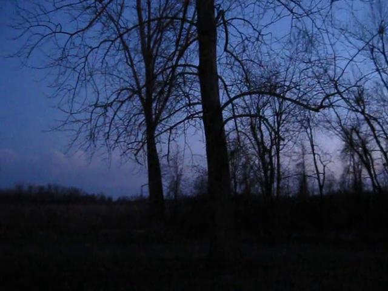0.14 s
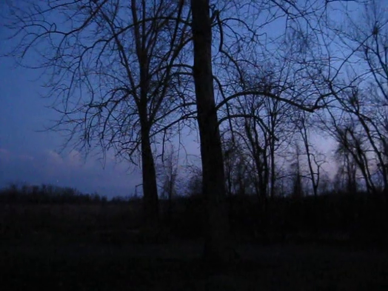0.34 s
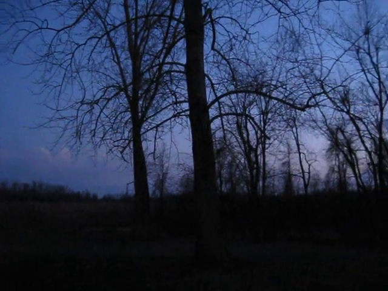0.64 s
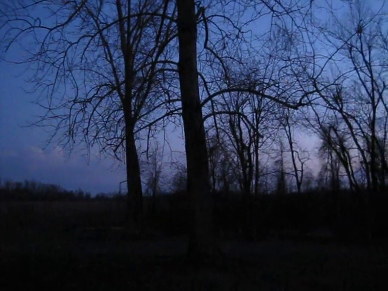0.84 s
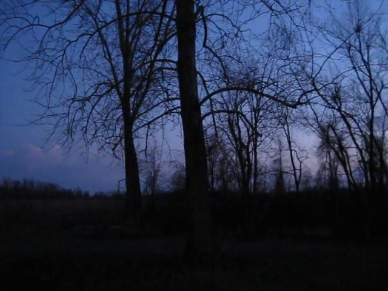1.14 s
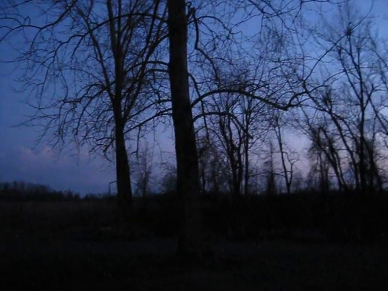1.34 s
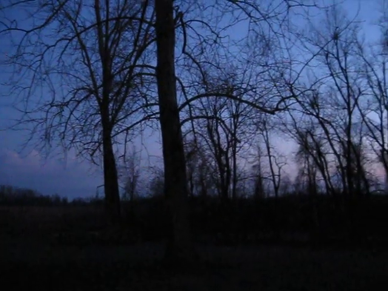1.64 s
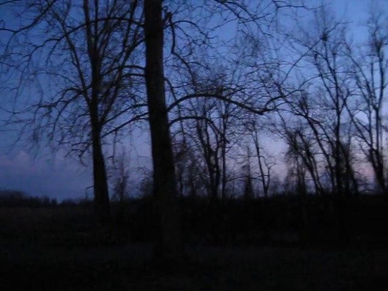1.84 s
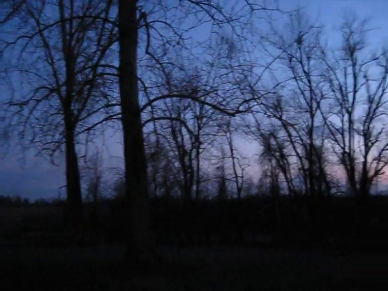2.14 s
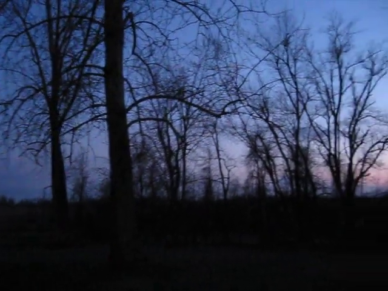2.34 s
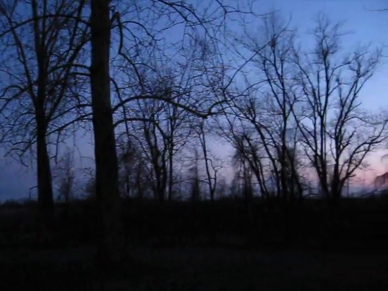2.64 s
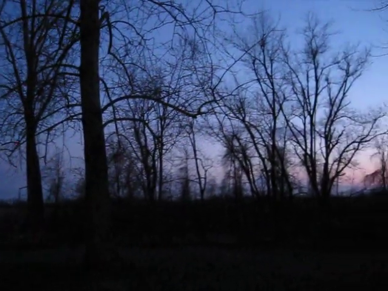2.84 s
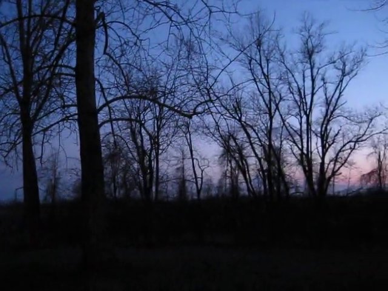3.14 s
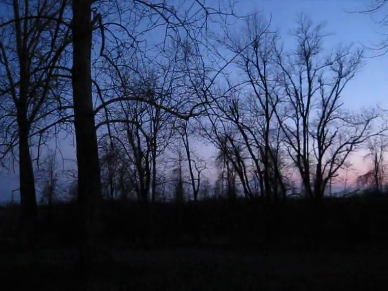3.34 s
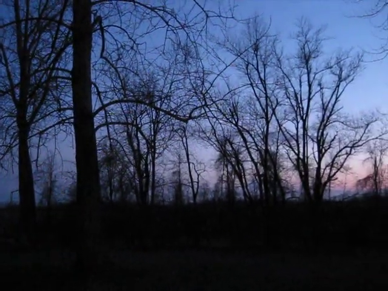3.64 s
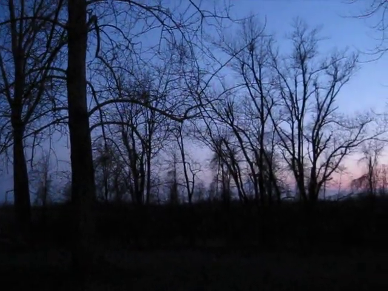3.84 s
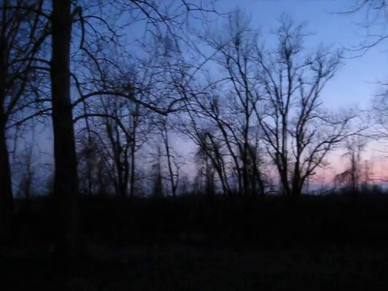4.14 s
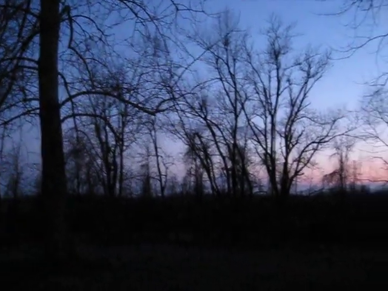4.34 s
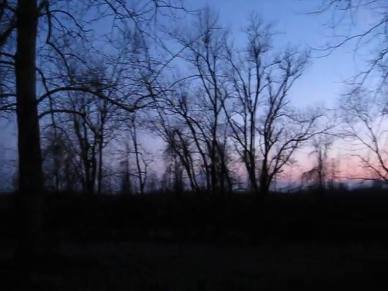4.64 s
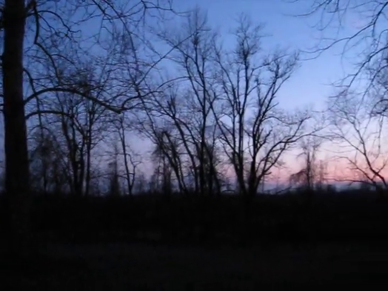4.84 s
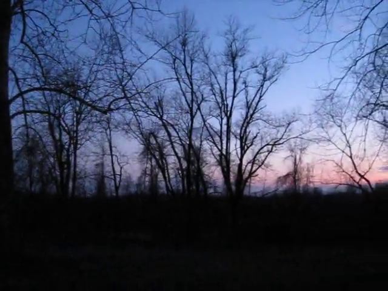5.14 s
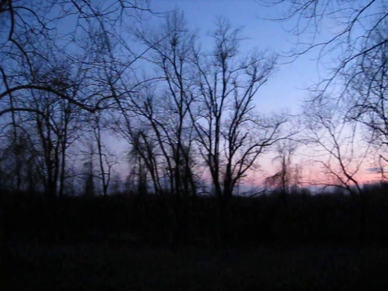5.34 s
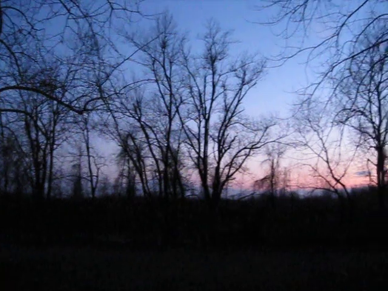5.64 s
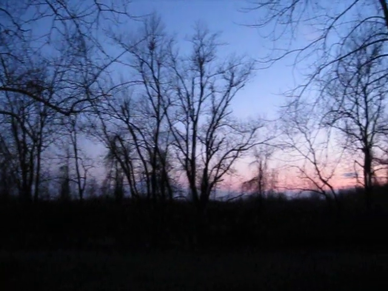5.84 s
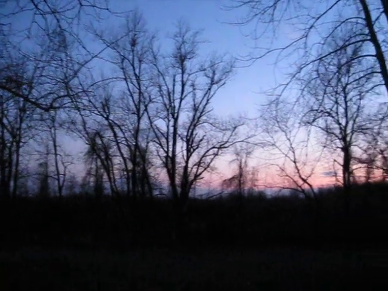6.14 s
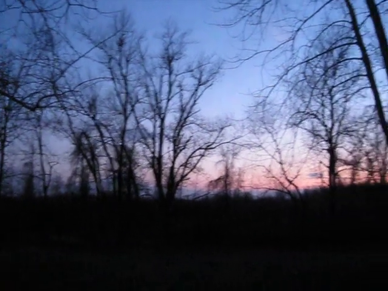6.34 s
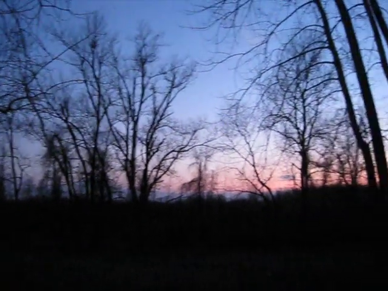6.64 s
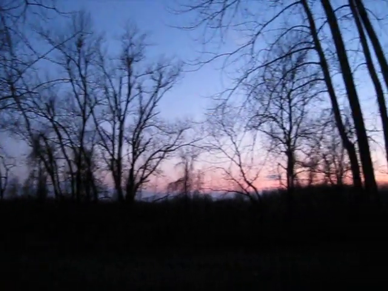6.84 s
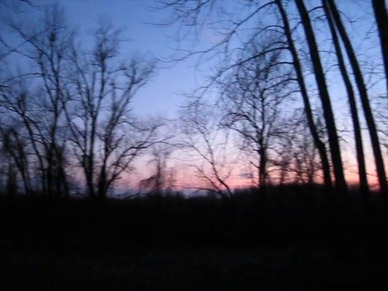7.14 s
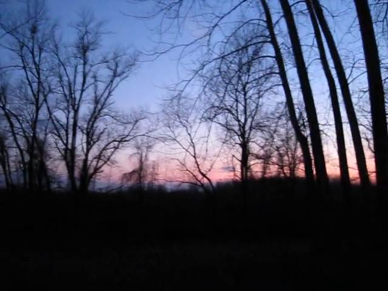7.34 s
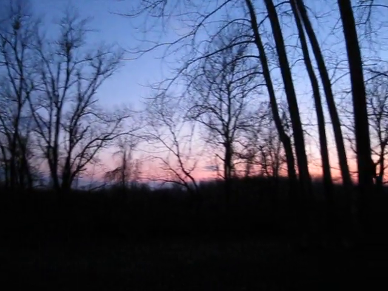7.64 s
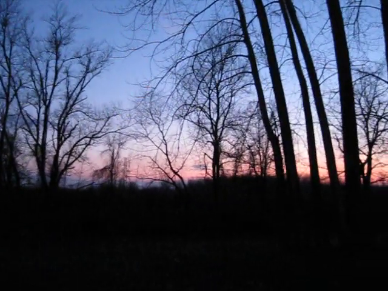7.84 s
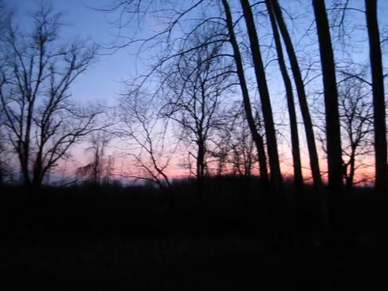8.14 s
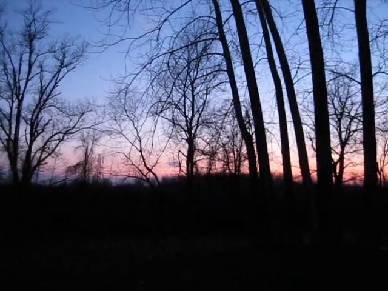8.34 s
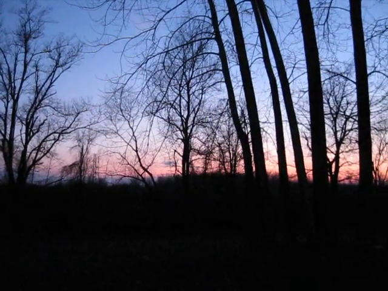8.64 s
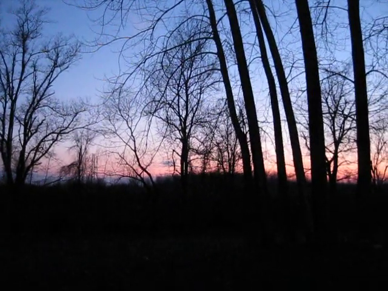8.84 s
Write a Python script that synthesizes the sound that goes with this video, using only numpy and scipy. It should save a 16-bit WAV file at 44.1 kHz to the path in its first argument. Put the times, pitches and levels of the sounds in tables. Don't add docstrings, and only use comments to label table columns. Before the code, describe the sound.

Hundreds of tiny frogs whistle rising peeps in a shimmering wall outdoors, dotted with short bird chirps, faint clicking trills and a distant engine drone.

```python
import sys
import numpy as np
from scipy import signal
from scipy.fft import rfft, irfft
from scipy.io import wavfile
from scipy.ndimage import uniform_filter1d

SR = 44100
rng = np.random.default_rng(int(sys.argv[2]) if len(sys.argv) > 2 else 0)


def unload_audio(sound):
    columns = np.transpose(np.atleast_2d(sound))
    steps = np.round(np.clip(columns, -1, 1) * 32767)
    wavfile.write(sys.argv[1], SR, steps.astype(np.int16))


def linear_from_db(decibels):
    return 10 ** (np.asarray(decibels, float) / 20)


N = 396900

# time in seconds, level in dB.
CHORUS_LEVEL = [
    (0, -33.5),
    (1.8, -33),
    (3, -33.5),
    (5.6, -33.5),
    (6.3, -35),
    (6.7, -34.5),
    (7.2, -35.5),
    (9, -34.5),
]
# start in seconds, middle pitch in Hz, peak in dB, upward glide in Hz per s.
NEAR_PEEPS = [(0.144, 2874, -28.5, 3000), (0.248, 2890, -31, 2040), (0.35, 3000, -31, 2020),
              (0.777, 2920, -45, 2950), (0.878, 3013, -30.5, 1010), (0.947, 2840, -35, 2040),
              (1.068, 3080, -28, 2970), (1.188, 3020, -33, 1030), (1.311, 2870, -32, 1030),
              (1.551, 2970, -29, 1010), (1.747, 3110, -28.5, 2990), (1.882, 2933, -36, 1990),
              (2.337, 2880, -31, 3020), (2.381, 2980, -30, 1975), (2.551, 2905, -35, 1990),
              (2.679, 2894, -28, 2100), (2.794, 2867, -29, 1000), (3.38, 2930, -38, 980),
              (3.565, 2987, -35, 1000), (3.755, 2935, -32, 2990), (4.099, 2816, -31.5, 3030),
              (5.27, 3000, -35.5, 1990), (5.693, 2966, -33, 2010), (6.311, 2820, -33.5, 2070),
              (6.43, 2887, -36, 990), (6.53, 2870, -32, 980), (6.735, 2930, -31.5, 1000),
              (8.402, 3003, -39, 3100)]
# time in seconds, peak in dB.
TICKS = [(0.2653, -47), (0.3152, -44), (0.3516, -43), (0.3915, -44), (0.4344, -39), (0.4793, -42),
         (0.5267, -46), (2.1306, -45), (2.1675, -40), (2.2064, -39), (2.2463, -40), (2.2877, -39),
         (2.3291, -42), (2.7906, -41), (2.8459, -39), (2.9073, -36), (2.9652, -38), (3.0165, -37),
         (4.6698, -43), (4.7331, -40), (4.7905, -41)]
# start in seconds, length in seconds, clicks per second, pitch in Hz, level in dB.
NEAR_TRILLS = [
    (2.7, 0.33, 23, 2300, -46),
]
# time in seconds, peak in dB.
KNOCKS = [(7.7913, -50), (7.9456, -51), (7.9982, -49), (8.0486, -55), (8.0945, -54), (8.142, -53),
          (8.1946, -49), (8.2565, -51), (8.2894, -52), (8.3536, -50), (8.439, -46), (8.5285, -52),
          (8.5886, -46), (8.7036, -44.5), (8.759, -49), (8.7999, -53), (8.8553, -48), (8.9042, -54)]

# start in seconds, low voice in Hz, its level in dB,
# high voice in Hz, its level in dB.
CHIRPS = [(0.0594, 4260, -43, 6860, -55.5), (0.557, 4264, -44, 7280, -55.5),
          (1.0938, 4220, -34.5, 6520, -47), (1.39, 4380, -37, 7090, -51.5), (1.875, 4340, -33, 6680, -48),
          (2.379, 4260, -43, 7030, -54.5), (3.158, 4350, -47, 6950, -58), (3.6753, 4350, -36.5, 6970, -52),
          (4.013, 4285, -44.5, 6920, -56.5), (4.7233, 4200, -40, 6440, -50),
          (4.977, 4360, -48.5, 6990, -59.5), (5.505, 4290, -39, 6850, -49), (5.8872, 4220, -47, 6950, -62),
          (6.739, 4290, -48, 6850, -62.5), (7.198, 4250, -38.5, 6710, -50.5),
          (7.3916, 4254, -50, 7000, -64), (8.8573, 4265, -39.5, 6570, -52.5)]
# start in seconds, low voice in Hz, its level in dB,
# high voice in Hz, its level in dB.
ANSWERS = [
    (3.0277, 4210, -41.5, 6660, -56.5),
    (3.756, 4180, -42.5, 6730, -59),
    (5.615, 4100, -41, 6650, -59),
    (7.8903, 4070, -41, 6400, -60.5),
]
# echo of the low voice in dB,
# closing slur in dB, climb in Hz per s, depth of the opening scoop as a fraction of pitch.
CARRY = [(-43, -41, 1000, .18), (-39, -43, 1000, .18), (-47, -41, 4500, .2), (-40, -36, 2500, .2),
         (-46, -43, 2500, .19), (-41, -40, 1000, .17), (-52, -47, -900, .23), (-39, -37, 1000, .21),
         (-50, -50, 4000, .18), (-53, -52, -600, .23), (-41, -41, 800, .15), (-51, -46, 1200, .19),
         (-40, -38, 1200, .2), (-49, -44, 3000, .18), (-52, -52, -800, .23), (-39, -45, 300, .12),
         (-43, -42, 500, .19), (-51, -45, 300, .19), (-45, -52, 500, .15), (-54, -52, -800, .21),
         (-46, -47, 500, .19)]
# frequency in Hz, gain in dB.
BEAK = [(2000, -45), (3500, -1), (3900, 1), (4100, 5), (4400, 0), (4700, 12), (5300, 2.5), (6000, 6.5),
        (7000, 1.5)]
# frequency in Hz, gain in dB.
SUM_TONE_GAIN = [(3500, -8), (4600, 10), (5300, 4), (6000, -9), (9800, -13), (10500, -2), (11800, 0),
                 (12600, -8), (13500, -14)]
# start in seconds, length in seconds, start pitch in Hz,
# end pitch in Hz, peak in dB.
WHISTLES = [(.335, 0.045, 7080, 7260, -57.5), (.372, .055, 7240, 7170, -56), (.42, 0.026, 7180, 7500, -59),
            (2.215, .035, 4650, 4400, -58), (2.588, 0.059, 4100, 4520, -46), (2.80, .026, 4250, 3850, -50),
            (4.036, 0.0072, 4400, 5230, -45), (5.73, 0.044, 4300, 4650, -57), (5.788, .05, 4100, 4000, -48),
            (6.23, .03, 4000, 3680, -48.5), (.012, 0.032, 4060, 4050, -49), (6.5, .1, 6150, 6060, -67),
            (7.307, .02, 5550, 4900, -55), (7.325, .014, 4950, 6200, -55), (7.432, 0.11, 4350, 4320, -56),
            (7.562, 0.079, 4300, 4260, -60), (7.565, .02, 5600, 5550, -58), (7.595, .02, 5450, 5420, -60),
            (7.637, .024, 5550, 5480, -59), (7.18, .022, 4900, 4650, -52), (8.178, .028, 4700, 6400, -57),
            (8.201, 0.013, 4000, 4120, -42), (8.216, 0.012, 5370, 4500, -51),
            (8.336, .019, 4110, 3800, -45), (8.48, 0.013, 3800, 3970, -45),
            (8.487, 0.0079, 3780, 4970, -43)]
# start in seconds, length in seconds, start pitch in Hz, end pitch in Hz, peak in dB.
PIPES = [(.06, 0.05, 2100, 2160, -46), (.1, .014, 2150, 1950, -50), (.185, .05, 1960, 2130, -44),
         (.232, .016, 2120, 1950, -48), (2.057, 0.032, 2020, 1950, -53), (2.11, 0.027, 2100, 2150, -50),
         (2.213, .05, 1800, 1770, -52), (2.427, 0.056, 1790, 1690, -50), (2.69, .054, 1776, 1824, -50),
         (2.785, .05, 2200, 2060, -52), (3.346, .08, 2440, 2230, -48), (4.563, .11, 2210, 2150, -58),
         (5.0, 0.068, 2030, 2210, -48), (5.12, 0.048, 2030, 2050, -49), (5.125, 0.2, 2264, 2260, -54),
         (5.697, 0.092, 2000, 2330, -50), (1.37, .014, 1800, 2300, -47), (3.14, .014, 1800, 2300, -52),
         (3.995, .014, 1800, 2300, -52), (4.958, .014, 1800, 2300, -50)]
# time from its start in seconds, pitch in Hz, level in dB.
TWITTER_OPENING = [
    (0, 5000, -30),
    (.004, 7600, -12),
    (.012, 8600, -22),
    (.02, 8000, -12),
    (.027, 7800, -24),
    (.032, 4950, 0),
    (.0395, 6200, -32),
]
# time from its start in seconds, pitch in Hz, level in dB.
TWITTER_HOOK = [
    (0.039, 6600, -30),
    (.042, 6870, -7),
    (.048, 7400, -5.5),
    (.057, 6700, -30),
]
# time from its start in seconds, pitch in Hz, level in dB.
TWITTER_LOW = [
    (0.047, 4030, -32),
    (.053, 4240, 3),
    (.06, 4710, 0.5),
    (.063, 5360, -12),
    (.067, 4200, 4),
    (0.069, 3500, -28),
]
# time from its start in seconds, pitch in Hz, level in dB.
TWITTER_END = [
    (.069, 8000, -30),
    (.075, 8500, -23),
    (.083, 8300, -18),
    (.088, 7900, -30),
]
# start in seconds, level in dB.
TWITTERS = [
    (7.088, -39),
    (8.382, -39),
]
# start in seconds, length in seconds, pulses in Hz, level in dB.
BUZZES = [
    (.69, 0.21, 175.2, -53.5),
    (2.9, .12, 175, -64),
    (4.052, 0.15, 164, -67),
    (5.02, 0.16, 175.6, -61),
    (6.88, 0.19, 174.7, -56.5),
]
# frequency in Hz, width in Hz, level in dB.
BUZZ_THROAT = [
    (4730, 620, 11),
    (5900, 700, -31),
]

# time in seconds, fifth order in Hz, level in dB.
ENGINE = [(0, 88.1, -50), (.5, 88.2, -58), (2, 88.2, -53), (2.3, 88.1, -61), (2.6, 88.2, -54),
          (3.3, 88.2, -55), (3.7, 88.2, -49.5), (4.44, 88.4, -52.5), (5.4, 89.3, -54), (5.85, 90.8, -59),
          (6.8, 92.0, -55.5), (8.22, 92.7, -52.5), (8.4, 93.6, -58.5), (9, 94.7, -55.5)]
# order number, level in dB.
ORDERS = [(1, -32), (2, -18), (3, -2), (4, -2.5), (5, 0.5), (6, -8), (7, -9), (8, -15), (9, -13),
          (10, -15.5), (11, -23)]
# frequency in Hz, density in dB per Hz.
AIR = [(25, -26), (60, 6.5), (150, 2), (320, -3.5), (580, -6), (900, -2), (1250, -6), (1550, -3),
       (2300, -4), (3000, -11), (3900, -8), (6300, -17), (9300, -22), (15600, -25.5)]
# frequency in Hz, time to decay by 60 dB in seconds.
WOODS = [(2000, 0.42), (3000, 0.95), (4300, 0.72), (7000, 0.66), (11000, 0.5)]

TICK_HZ = 3600
KNOCK_HZ, KNOCK_SPREAD = 1843, 0.014
KNOCK_S, KNOCK_ARCH = 0.0435, 0.201
# level of sum tones in dB, hold in s, fade in s, hoarseness of the high voice.
CALLER, ANSWERER = (-57, .022, .045, .002), (-66, .05, .03, .03)
FACING_DB, SUM_FOLLOWS = -53.5, 1.48
RISE_HIGH_S, RISE_LOW_S, SLUR_AT_S = .0082, .0062, .052
RASP, BRANCH_S, BRANCH_DB = 0.22, .022, -10
ARCH_HZ = 24.4
TURN_S, TURN_SPAN_S, TURN_DB = 6.1, 3.4, 9
AIR_DB = -49.5
DEAD_HZ, DEAD_WIDTH_HZ = 7860, 860


def peep(hz, glide, length):
    u = np.arange(round(length * SR)) / (length * SR)
    pitch = hz + glide * length * (1.25 * u ** .7 - .75)
    swell = np.sin(np.pi * u ** 0.92)
    wave = tone(pitch)
    octave = wave ** 2 - .5
    return np.sqrt(swell) * (wave + linear_from_db(-34.0) * octave)


def chorus(count=240):
    ponds, near = np.zeros((2, N)), np.zeros(N)
    for k, (a, b, c, d, e) in enumerate(rng.standard_normal((count, 5))):
        length = .135 + 0.01468 * np.clip(d, -2, 2)
        call = linear_from_db(0.52 * a - 0.91 * abs(b)) * peep(2935 + 125 * b, 2100 + 500 * c, length)
        for s in np.arange(-rng.random(), N / SR, .8 + .08 * e):
            s = s + .08 * rng.standard_normal()
            add(ponds[k % 2], s, call[max(round(-s * SR), 0):])
    crowd = np.zeros(N)
    for pond in ponds:
        blurred = pond + linear_from_db(-4.5) * woods(pond)
        crowd += blurred * flutter(900, 0.19) * flutter(40, 0.088)
    for s, hz, db, glide in NEAR_PEEPS:
        add(near, s - .015, linear_from_db(db - 4.5) * peep(hz, glide, .13))
    s, db = np.transpose(CHORUS_LEVEL)
    crowd = crowd / uniform_filter1d(crowd ** 2, size=6000) ** 0.33
    crowd = evened(crowd) * linear_from_db(np.interp(np.arange(N) / SR, s, db))
    return crowd + (near + linear_from_db(-9.5) * woods(near)) * flutter(29.63, 0.16)


def click(hz):
    u = np.arange(700) / SR
    envelope = u / 0.0015 * np.exp(1 - u / 0.0019)
    low_mode = np.sin(.87 * np.pi * hz * u)
    return envelope * (np.sin(2 * np.pi * hz * u) + linear_from_db(-11.5) * low_mode)


def ticker():
    out = np.zeros(N)
    for s, db in TICKS:
        add(out, s - .0015, linear_from_db(db - 3.0) * click(TICK_HZ))
    return out


def trill(length, rate, hz):
    out, ring = np.zeros(round(length * SR) + 700), click(hz)
    for s in np.arange(0, length, 1 / rate):
        add(out, s, ring * np.sin(2.45 * (s / length) ** 0.43 + 0.17))
    return out


def trillers(count=70):
    out = np.zeros(N)
    for s, (a, b, c) in zip(rng.uniform(-.3, N / SR, count), rng.standard_normal((count, 3))):
        add(out, s, linear_from_db(-50 + 3.0 * a) * trill(1.0, 21 + 3 * b, 3420 + 130 * c))
    for s, length, rate, hz, db in NEAR_TRILLS:
        add(out, s, linear_from_db(db) * trill(length, rate, hz))
    return out


def creaker():
    out, u = np.zeros(N), np.arange(0, 1, 1 / (KNOCK_S * SR))
    pitches = KNOCK_HZ * (1 + KNOCK_SPREAD * rng.standard_normal(len(KNOCKS)))
    arch = 1.02 - KNOCK_ARCH * (2 * u - 1) ** 2
    for (s, db), hz in zip(KNOCKS, pitches):
        add(out, s - .009, linear_from_db(db - 1.2) * np.sin(np.pi * u) ** 0.81 * tone(hz * arch))
    return out


def chirp(low_hz, low_db, high_hz, high_db, sum_db, hold, fade, hoarse, slur_db, climb, scoop):
    t = np.arange(-.03, .13, 1 / SR)
    lag_high = np.exp(-(t + .002) / RISE_HIGH_S)
    lag_low = np.exp(-(t - .003) / RISE_LOW_S)
    high = high_hz * (1.008 - .2 * lag_high / (1 + .2 * lag_high))
    sweep = 1.01 - scoop * lag_low / (1 + 0.0967 * lag_low)
    low = low_hz * np.maximum(sweep, .05) + climb * (t - .03)
    held = np.clip((t + 0.022) / 0.008, 0, 1) * np.clip((hold + fade - t) / fade, 0, 1)
    breath = [evened(uniform_filter1d(rng.standard_normal(len(t)), size=90)) for _ in range(3)]
    rasp = 1 + RASP * np.array(breath)

    low_voice = linear_from_db(low_db + read(BEAK, low)) * tone(low) * rasp[0]
    low_voice = low_voice * linear_from_db(-11.0 * np.minimum(lag_low, 1.5))
    hoarse_pitch = high * (1 + hoarse * breath[2])
    high_voice = linear_from_db(high_db + read(BEAK, high)) * tone(hoarse_pitch) * rasp[1]
    call = low_voice + high_voice
    sum_tones = ((low + high, .1),
                 (2 * high, -12 + 11.0 * np.minimum(lag_high, 1)),
                 (2 * low, -4),
                 (1.5 * low, -30 + 14.0 * np.minimum(lag_low / 3, 1)))
    for mixed, db in sum_tones:
        call += linear_from_db(sum_db + db + read(SUM_TONE_GAIN, mixed)) * tone(mixed) * rasp[2]

    u = np.clip((t - SLUR_AT_S) / .03, 0, 1)
    slur = linear_from_db(slur_db) * np.sin(np.pi * u ** 0.87) * tone(3500 - 1800 * u ** 1.2) * rasp[0]
    call = held * call
    call = call + linear_from_db(-13.0) * np.roll(call, round(.005 * SR))
    branches = np.zeros(len(t))
    for late in rng.random(4):
        branches += linear_from_db(BRANCH_DB - 5.9 * late) * np.roll(call, round((.003 + BRANCH_S * late) * SR))
    return call + branches, slur


def figure(rows):
    s, hz, db = np.transpose(rows)
    t = np.arange(s[0], s[-1], 1 / SR)
    return s[0], linear_from_db(np.interp(t, s, db)) * tone(np.interp(t, s, hz))


def buzz(length, pulse_hz):
    t = np.arange(0, length, 1 / SR)
    jitter = .04 * evened(uniform_filter1d(rng.standard_normal(len(t)), size=400))
    cycles = t * pulse_hz * (1 - 0.027 * t) + jitter
    pulses = np.diff(np.floor(cycles), prepend=0.)
    u = t[:300]
    ring = sum(linear_from_db(db) * np.exp(-np.pi * width * u) * np.sin(2 * np.pi * hz * u)
               for hz, width, db in BUZZ_THROAT)
    return evened(np.convolve(pulses, ring)[:len(t)]) * signal.windows.tukey(len(t), .5)


def birds():
    direct, sends, far = np.zeros(N), np.zeros((3, N)), np.zeros(N)
    calls = sorted([(row, CALLER) for row in CHIRPS] + [(row, ANSWERER) for row in ANSWERS])
    for k, (row, (sum_db, hold, fade, hoarse)) in enumerate(calls):
        s, low_hz, low_db, high_hz, high_db = row
        echo_db, slur_db, climb, scoop = CARRY[k]
        own_sum_db = sum_db + SUM_FOLLOWS * (high_db - FACING_DB)
        call, slur = chirp(low_hz, low_db, high_hz, high_db, own_sum_db, hold, fade, hoarse,
                           slur_db, climb, scoop)
        add(direct, s - .03, call + slur)
        add(sends[k % 3], s - .03, linear_from_db(echo_db - low_db) * (call + linear_from_db(-4.0) * slur))
    for s, length, hz0, hz1, db in PIPES + WHISTLES:
        u = np.arange(0, 1, 1 / (length * SR))
        pitch = hz0 + (hz1 - hz0) * u + ARCH_HZ * np.sin(np.pi * u)
        add(far, s, linear_from_db(db) * signal.windows.tukey(len(u), .6) * tone(pitch))
    for s, db in TWITTERS:
        for rows in (TWITTER_OPENING, TWITTER_HOOK, TWITTER_LOW, TWITTER_END):
            start, line = figure(rows)
            add(far, s + start, linear_from_db(db) * line)
    for s, length, hz, db in BUZZES:
        add(far, s, linear_from_db(db) * buzz(length, hz))
    sends[0] += linear_from_db(-7) * far
    echoes = sum(woods(send, clump_db=2.0) for send in sends)
    return direct + far + echoes * flutter(300, 0.24)


def engine(step=40):
    s, hz, db = np.transpose(ENGINE)
    t = np.arange(0, N + step, step) / SR
    turns = np.cumsum(np.interp(t, s, hz) / 5) * step / SR
    out = np.zeros(len(t))
    swell_db = TURN_DB * (np.exp(-((t - TURN_S) / TURN_SPAN_S) ** 2) - .4)
    for k, order_db in ORDERS[3:]:
        fade = np.interp(t, np.linspace(0, N / SR, 40), rng.standard_normal(40))
        if k == 5:
            own_db = np.interp(t, s, db)
        else:
            own_db = np.mean(db) - 2.5 + 1.3 * fade + swell_db * (k > 6)
        out += linear_from_db(own_db + order_db + 3.0) * np.sin(2 * np.pi * (k * turns + rng.random()))
    return signal.resample_poly(out, step, 1)[:N] * flutter(11, 0.19)


def air():
    frames, hz = N // 256 + 5, np.fft.rfftfreq(1024, 1 / SR)
    a, b, patches = rng.standard_normal((frames, 513, 3)).T
    patches = uniform_filter1d(patches, size=8, axis=0)
    patches = evened(uniform_filter1d(patches, size=30, axis=1))
    z = (a + 1j * b) * linear_from_db(read(AIR, hz)[:, None] + 0.73 * patches)
    noise = signal.istft(z, nperseg=1024, noverlap=768)[1][:N]
    return linear_from_db(AIR_DB) * evened(noise)


def woods(x, gap=.008, clump_db=0.5):
    taps = np.zeros(24000)
    at = np.arange(0, 24000, 20) + rng.integers(0, 20, 1200)
    taps[at] = rng.choice([-1., 1.], len(at))
    hz, t, z = signal.stft(taps, SR, nperseg=256)
    clumps = evened(uniform_filter1d(rng.standard_normal(len(t)), size=5))
    decay_db = -60 * t / read(WOODS, hz)[:, None]
    z = z * linear_from_db(decay_db + clump_db * clumps) * (t > gap)
    tail = signal.istft(z, SR, nperseg=256)[1]
    return drifted(signal.oaconvolve(x, tail / np.linalg.norm(tail))[:N])


def drifted(x, rate_hz=14, delay=.00017):
    steps = round(N / SR * rate_hz) + 2
    wander = signal.resample(rng.standard_normal(steps), N // 50 + 1)
    at = np.arange(N)
    shift = delay * SR * np.interp(at, np.arange(len(wander)) * 50, wander)
    return np.interp(at + shift, at, x)


def flutter(rate_hz, depth):
    steps = round(N / SR * rate_hz) + 2
    return 1 + depth * np.interp(np.arange(N), np.linspace(0, N, steps), rng.standard_normal(steps))


def tone(hz):
    return np.sin(2 * np.pi * np.cumsum(hz) / SR)


def evened(x):
    return x / np.sqrt(np.mean(x ** 2) + 1e-20)


def read(points, hz):
    f, value = np.transpose(points)
    return np.interp(np.log(np.maximum(hz, 1)), np.log(f), value)


def add(mix, s, sound):
    part = mix[max(round(s * SR), 0):][:len(sound)]
    part += sound[:len(part)]


def scene():
    clickers = trillers() + creaker()
    frogs = chorus() + ticker() + clickers + linear_from_db(-4.5) * woods(clickers)
    return (frogs + birds() + engine() + air())[None]


def low_pass(x):
    return signal.sosfilt(signal.butter(12, 15800, fs=SR, output="sos"), x)


def record(dry):
    off = (np.fft.rfftfreq(N, 1 / SR) - DEAD_HZ) / DEAD_WIDTH_HZ
    notch = (abs(off) + 0.0086) / np.sqrt(1 + off ** 2)
    mix = irfft(rfft(dry) * notch, N)
    return low_pass(mix)


dry = scene()
out = record(dry)
unload_audio(out)
```